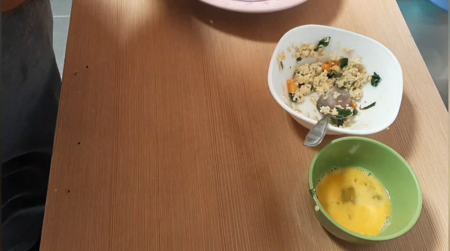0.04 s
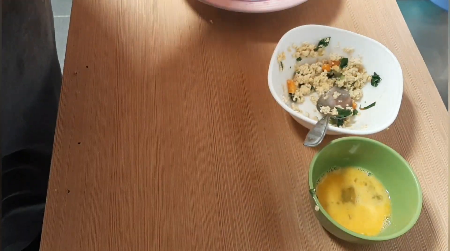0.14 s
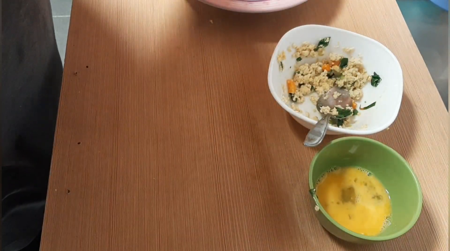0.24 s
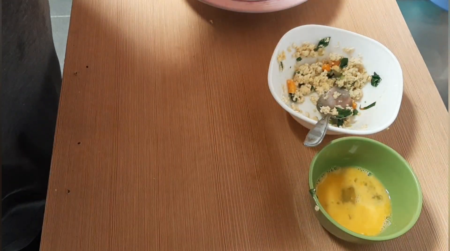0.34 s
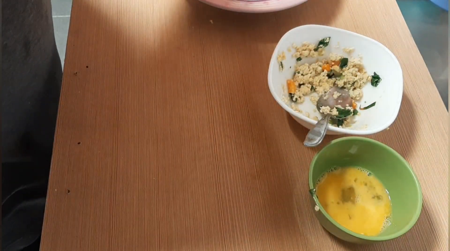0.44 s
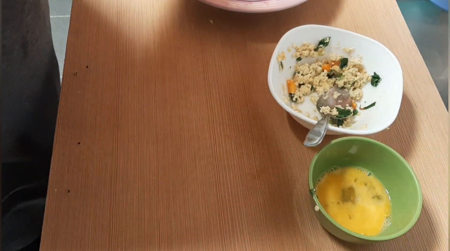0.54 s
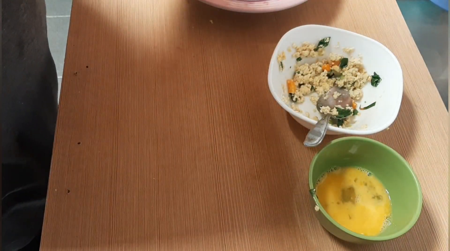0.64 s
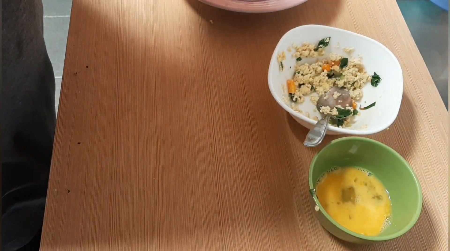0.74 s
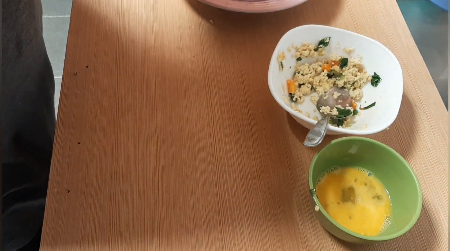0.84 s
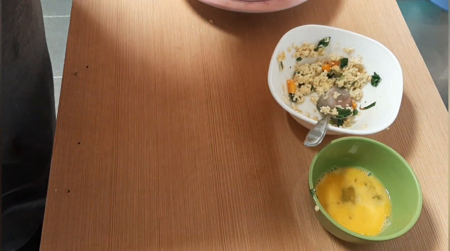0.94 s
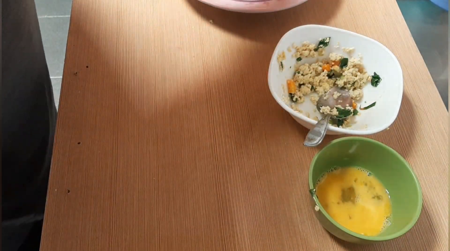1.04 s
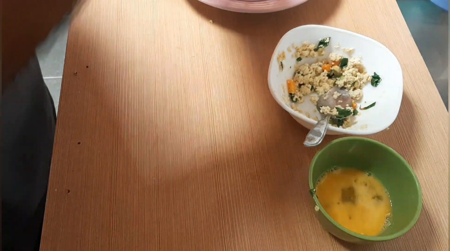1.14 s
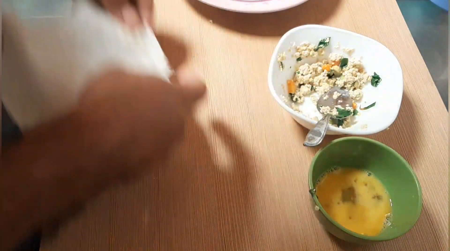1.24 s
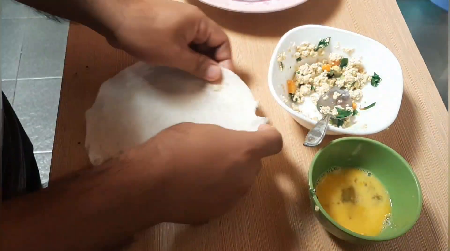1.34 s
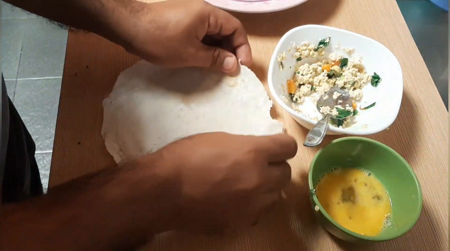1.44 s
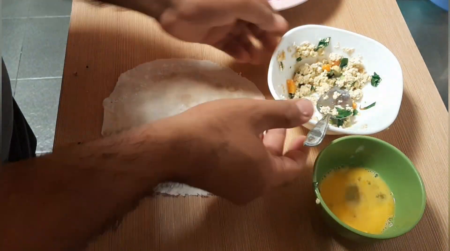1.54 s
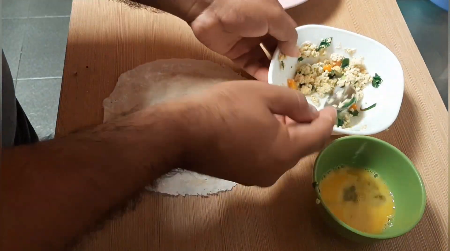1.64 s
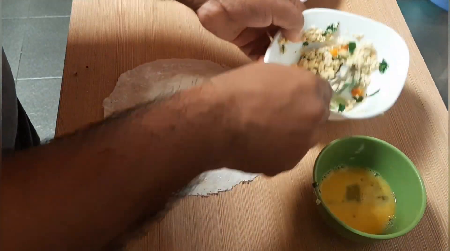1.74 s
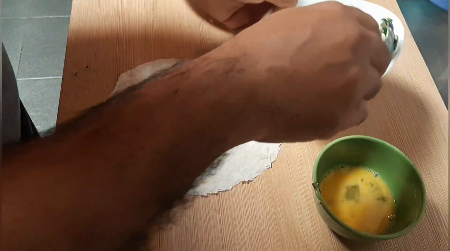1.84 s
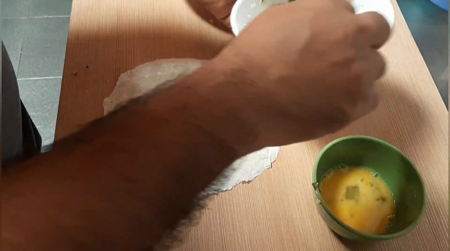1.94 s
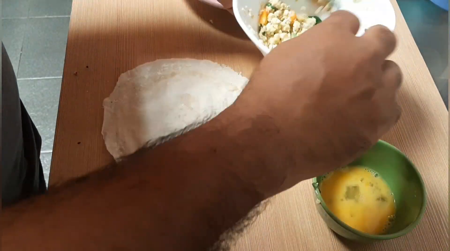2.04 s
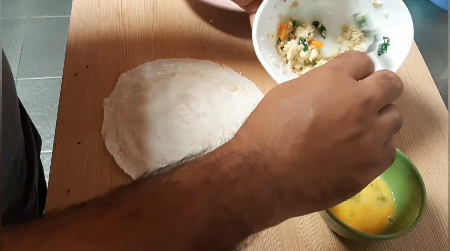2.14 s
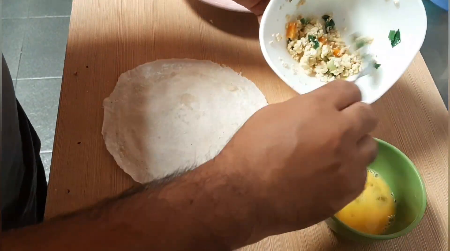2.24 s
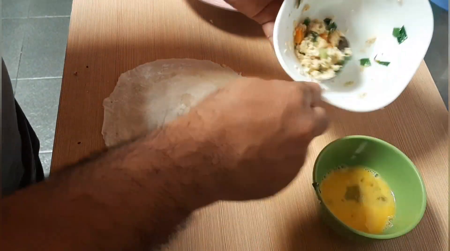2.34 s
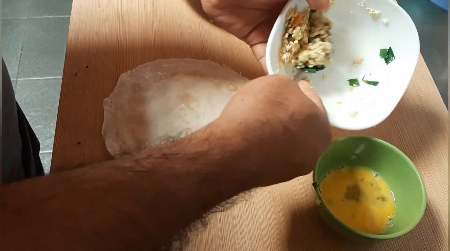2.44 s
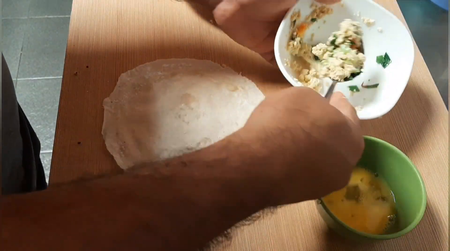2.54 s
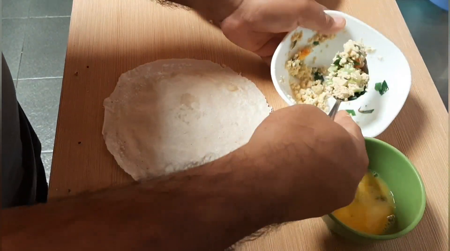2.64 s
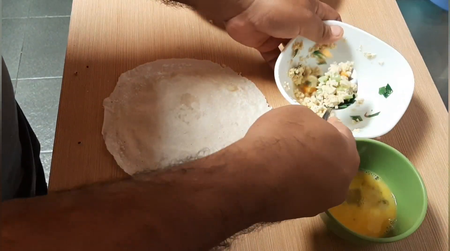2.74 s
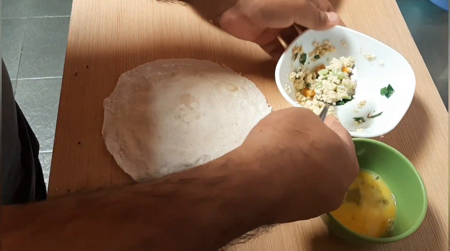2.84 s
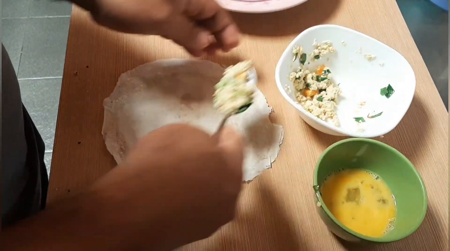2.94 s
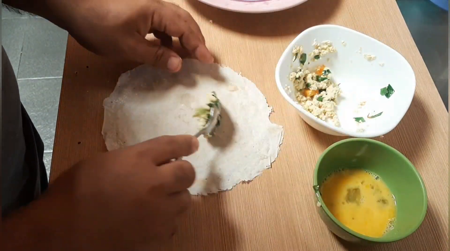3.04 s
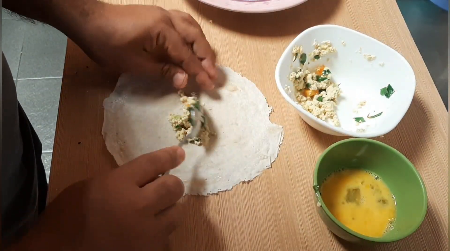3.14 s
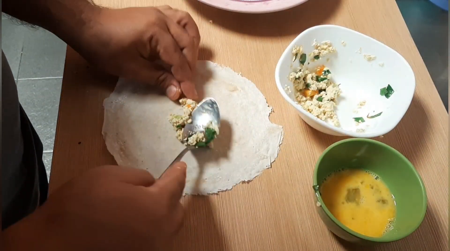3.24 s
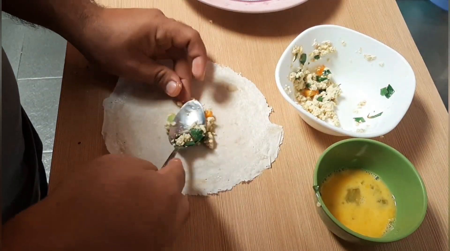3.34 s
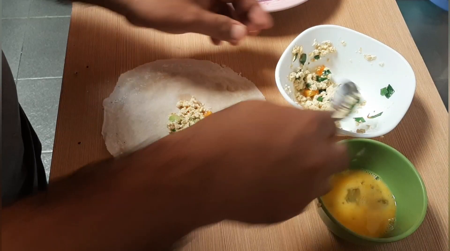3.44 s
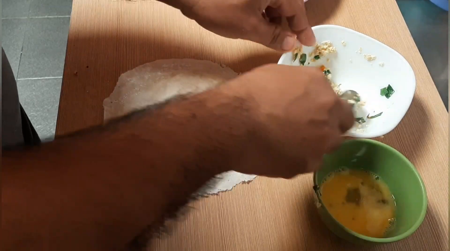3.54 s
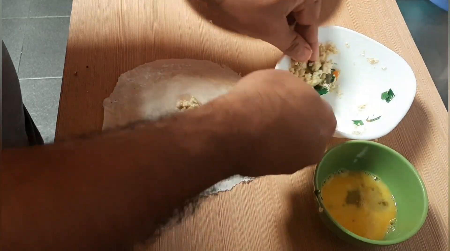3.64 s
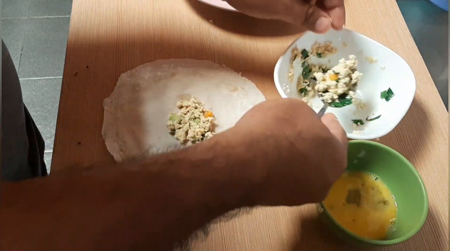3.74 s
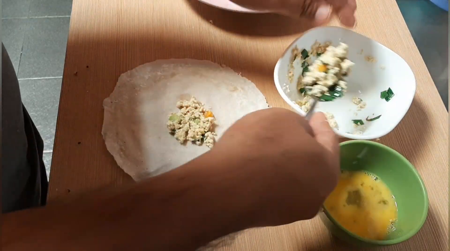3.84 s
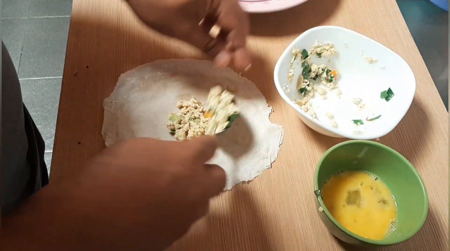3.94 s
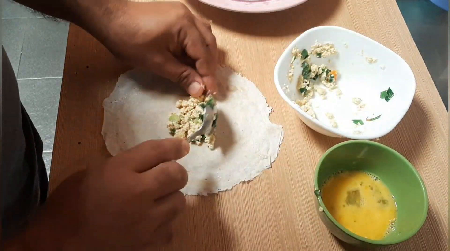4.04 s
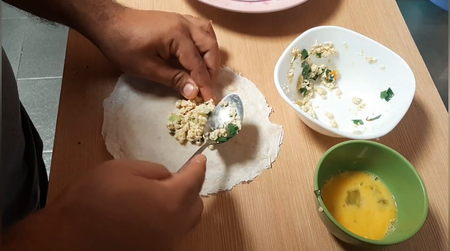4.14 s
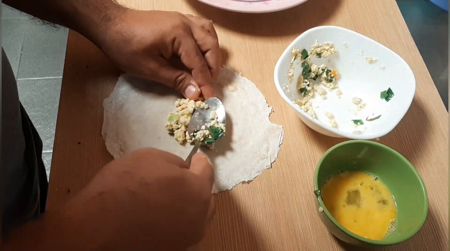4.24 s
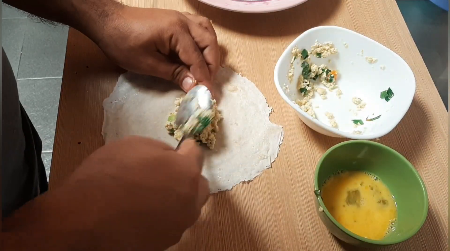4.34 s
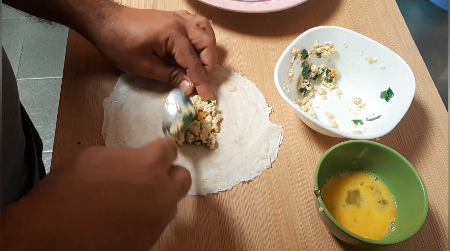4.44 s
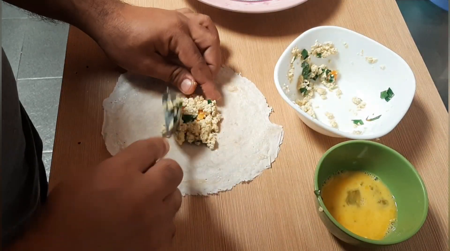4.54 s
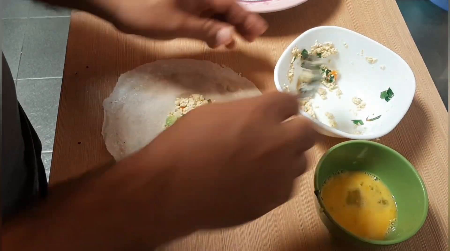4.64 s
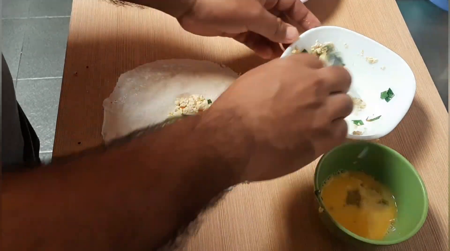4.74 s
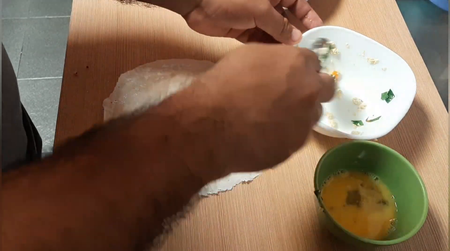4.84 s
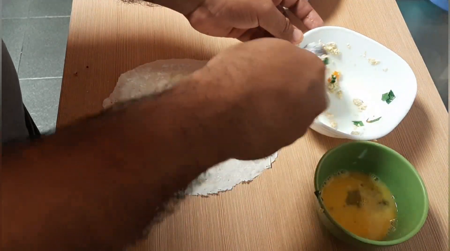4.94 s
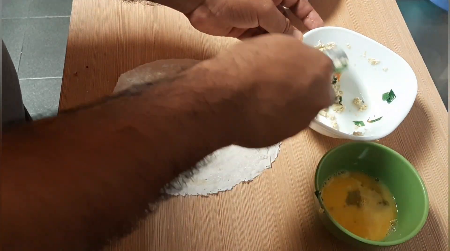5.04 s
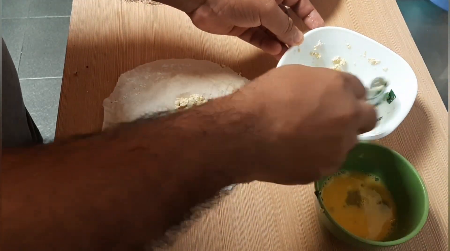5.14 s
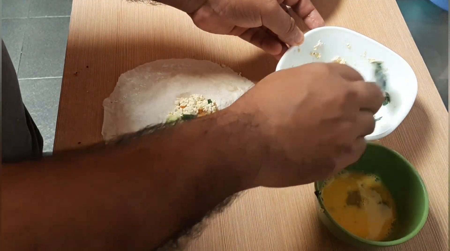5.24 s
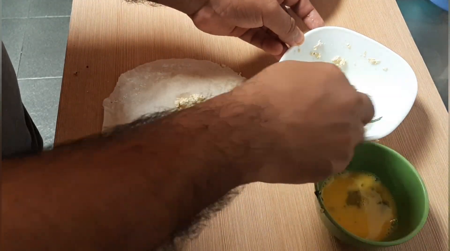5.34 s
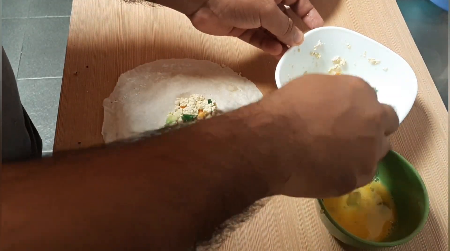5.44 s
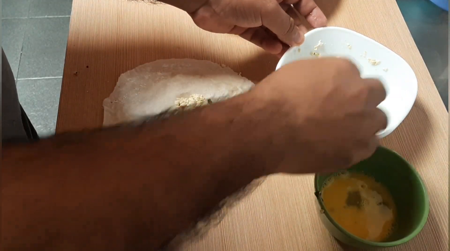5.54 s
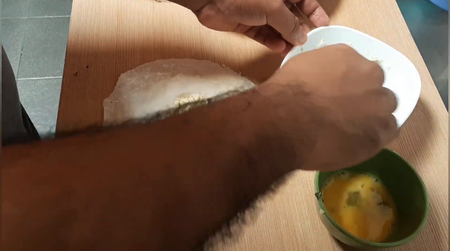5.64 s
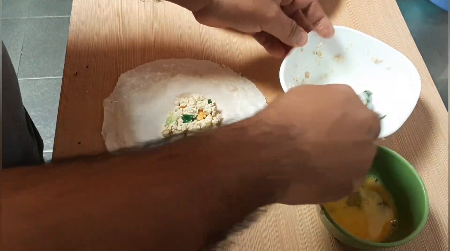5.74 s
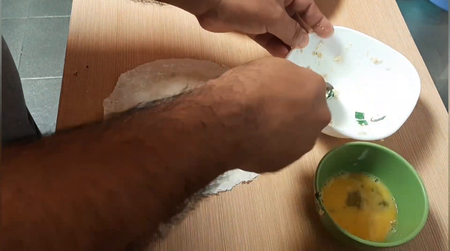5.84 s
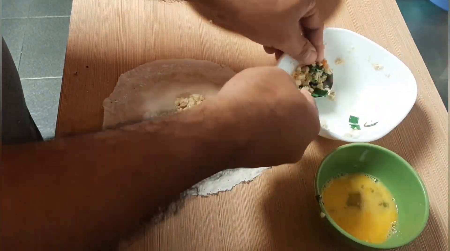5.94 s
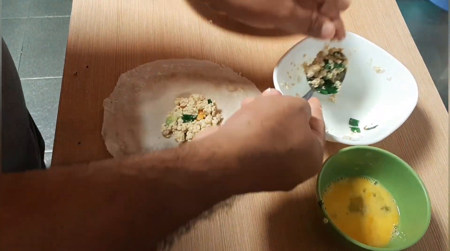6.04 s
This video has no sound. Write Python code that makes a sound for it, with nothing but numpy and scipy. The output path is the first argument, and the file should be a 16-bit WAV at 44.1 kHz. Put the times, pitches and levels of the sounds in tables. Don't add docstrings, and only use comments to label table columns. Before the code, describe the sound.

A quiet small kitchen with distant fan hum, airy hiss and wavering appliance drones; hands and dough rustle softly. At about 0.16 s the sound dips for an instant. Light brushes continue until small wooden taps at 1.7 s, when a spoon begins touching a ceramic bowl close by. A crisp clink at 2.1 s leads to a fast, dry cluster of clinks and scrapes at 2.2-2.4 s. Another clink at 2.65 s is followed by dull, hollow table knocks to 2.8 s. Mostly rustle remains until short clinks and scraping at 3.5-3.65 s, then a quieter stretch with faint brushes. From 4.77 s the spoon drags and strikes the emptier bowl: bright clinks at 4.9, 5.0 and 5.1 s, a strong ringing hit at 5.39 s, more at 5.6-5.7 s with a tiny wet squeak between, and final gritty scrapes and soft knocks at 5.8-6 s.

```python
import sys
import numpy as np
from scipy import signal
from scipy.io import wavfile
from scipy.ndimage import uniform_filter1d

SR = 44100
rng = np.random.default_rng(int(sys.argv[2]) if len(sys.argv) > 2 else 0)


def makeup_ratio(level_db):
    decades = np.asarray(level_db, float) / 20
    return 10 ** decades


def transcribe(u):
    v = np.clip(np.atleast_2d(u).T, -1, 1)
    q = np.round(v * 32767).astype(np.int16)
    wavfile.write(sys.argv[1], SR, q)


N = 269266
FREE_FROM, FREE_TO = 4.2, 5.785


def spoon():
    blow_rings, cracks = clinks()
    drag_rings, drag = scrapes()
    rings = blow_rings + drag_rings + pings()
    shake = wander((2, N), 250)
    rings *= makeup_ratio(1.6 * shake[0] + 0.7 * shake)

    t = np.arange(N) / SR
    free = (t >= FREE_FROM) & (t <= FREE_TO)
    contact = makeup_ratio(5.5) * cracks + makeup_ratio(np.where(free, -28, -25)) * drag
    edges_hz = [(700, 2260), (1500, 2900), (3300, 8900), (4800, 7230), (8900, 20000)]
    levels_db = [27.4, 22.9, 1.9, 17.2, 13.6]
    crack = squeak()
    for force, edges, db in zip(contact, edges_hz, levels_db):
        crack += makeup_ratio(db) * band(band(force, *edges), *edges)
    crack = np.array([np.roll(crack, 2), crack])
    return band(band(rings + crack, 400, 20000), 257, 20000)


def clinks():
    # (time [s], strength [dB], hardness [dB per family], lip of the rim [dB],
    # grip shift from family one to two [dB])
    blows = [(1.718, -46.5, -1, 3, 5), (1.7318, -64, -5, -1, 10), (2.0907, -29.5, 2.5, 7.5, -4.5),
             (2.2215, -45.5, 4.5, 10, 0), (2.2692, -24, 1, -4, -5.5), (2.2759, -27.5, 0.5, -6, 2.5),
             (2.377, -45.5, 1.5, 10, 6), (2.2910, -27.5, 2, -3, -8.5), (2.3045, -39, 3, -4, -9),
             (2.6419, -36, -1, -2, -1.5), (2.663, -60, -12, 0, 8), (2.678, -41.5, -1, 0, 11),
             (2.686, -44, 0.5, -3, 2), (1.927, -58, -6, -3, 7), (1.875, -56, -2.5, 0, -2.5),
             (1.993, -53, -1, 20, 0), (2.003, -51, 1.5, 15, -7), (2.319, -40.5, -1.5, -4, -5),
             (2.334, -41, 2, -4, -8), (2.3626, -43, 0.5, 14.5, 5), (3.548, -47, -4, -10, -4),
             (5.647, -59, 4, 12, 11), (2.812, -61, 1, -5, 17), (5.4, -41.5, -9, 8, 0),
             (3.5188, -35.5, 3, -2, -4.0), (3.5295, -37, 3.5, -25, -10), (3.5775, -39.5, 2.5, -15, -2),
             (3.6421, -36.5, 0, 6, -1), (4.906, -32.5, 2, 7.5, 8.5), (4.985, -24.5, 1, 5.5, 0),
             (5.0793, -34.5, 2, 0.8, 0.5), (5.1672, -41.5, -2, 6, -2), (5.3885, -19.5, -1.8, 5.5, 2),
             (5.5874, -35.5, 1.5, 4.5, -4), (5.708, -28.5, -0.9, -1, -3.5), (5.7335, -30.5, -0.7, -4, -1),
             (5.8068, -44, 4, -12, -9)]
    plain_db = [-9.5, -0.5, 0.5, 6.5, 5.5]
    hard_tilt, lip_tilt, grip_tilt = np.array([[-2, -1, 0, 1, 2], [0, 0, 1, 0, 0], [-1, 1, 0, 0, 0]])
    rings, cracks = np.zeros((2, N)), np.zeros((5, N))
    for s, db, hard, lip, grip in blows:
        colour = hard * hard_tilt + lip * lip_tilt + grip * grip_tilt
        strength = makeup_ratio(db + colour + plain_db)[:, None]
        add(rings, s - 0.0002, rim(s, makeup_ratio(5.0) * strength * bounce()))
        add(cracks, s - 0.0003, strength * chatter(0.0023, 0.00047))
    return rings, cracks


def scrapes():
    # (time [s], pressure [dB], hardness [dB per family], edge bite [dB], length [s])
    strokes = [(1.759, -58, 6.5, 17.5, 0.021), (1.869, -44, 3.5, -0.5, 0.057), (1.9897, -45, 6.5, 3, 0.047),
               (2.198, -35, 2.5, 2.5, 0.061), (2.303, -32, 3, 4, 0.065), (2.36, -34.5, -1, 4.5, 0.032),
               (3.522, -38, 5, 7, 0.075), (3.605, -44, -10, -4, 0.064), (4.771, -31, -2, -0.7, 0.05),
               (4.89, -24.5, 2, -5, 0.064), (4.895, -36.5, -7.5, 4, 0.14), (5.167, -34, 0.5, 2, 0.039),
               (5.8016, -47, 9.5, 14, 0.017), (5.8236, -36.5, -3, -3, 0.051),
               (5.939, -32.5, -3, -3.5, 0.036), (5.72, -35, -0.5, -8, 0.017),
               (5.588, -34.5, 0.5, -3, 0.033)]
    plain_db = [-11.5, 1.4, 1.3, 3, 2.3]
    hard_tilt, bite_tilt = np.array([[-1, -1, 0, 1, 2], [0, 0, 1, 1, 0]])
    slips = evened(rng.standard_normal(N) * makeup_ratio(3.8 * np.minimum(rng.exponential(1, N), 5)))
    slips *= makeup_ratio(1.2 * evened(uniform_filter1d(rng.standard_normal(N), 130)))
    rings, drag = np.zeros((2, N)), np.zeros((5, N))
    for s, db, hard, bite, length in strokes:
        colour = hard * hard_tilt + bite * bite_tilt
        push = makeup_ratio(db + colour + plain_db)[:, None] * stroke(length)
        push = push * slips[round(s * SR):][:push.shape[1]]
        add(drag, s - 0.007, push)
        add(rings, s - 0.007, rim(s, makeup_ratio(-25.0) * push))
    return rings, drag


def pings():
    # (time [s], level [dB], pitch [Hz], t60 [s])
    single_pings = [(2.642, -44.5, 3130, 0.071), (2.6427, -41.5, 1626, 0.15), (2.644, -43, 4700, 0.1),
                    (3.6133, -43, 3970, 0.1), (3.6420, -28, 3260, 0.028), (3.6418, -31.5, 4570, 0.019),
                    (4.9855, -22, 10830, 0.03), (5.167, -35, 9150, 0.078), (5.3888, -22, 10375, .08),
                    (5.3888, -22, 11940, .05), (2.2692, -17, 2239, .05), (5.3886, -13.5, 3921, .07),
                    (5.3886, -25, 3921, .2), (5.3886, -24, 3836, .06), (5.396, -25.5, 2256, .14),
                    (2.7674, -23, 1384, 0.03), (2.7662, -31, 760, .025), (2.2699, -22, 3823, 0.061),
                    (5.3882, -20, 1550, 0.013), (2.6735, -24.5, 692, 0.16), (2.767, -37, 1054, 0.11),
                    (2.766, -44, 1550, 0.15), (5.078, -31.5, 2660, 0.016), (5.177, -48, 1655, 0.073),
                    (5.28, -62, 2235, 0.18), (1.995, -43, 9200, 0.054), (5.5878, -30, 13760, 0.1),
                    (5.5874, -25, 3993, 0.094), (5.7324, -35.5, 6380, 0.033), (5.806, -26.5, 6620, 0.017),
                    (5.8076, -43.5, 2820, 0.032), (6.0182, -39, 650, 0.026)]
    out = np.zeros((2, N))
    for s, db, hz, t60 in single_pings:
        add(out, s, makeup_ratio(db + 2.5) * ring([(hz, 0, t60)], 0.24))
    return out


def squeak():
    start_s, length_s, from_hz, to_hz, db = 5.636, 0.036, 2900, 2000, -40
    u = np.linspace(0, 1, round(length_s * SR))
    glide = to_hz + (from_hz - to_hz) * (1 - u) ** 2
    glide *= 1 + 0.05 * evened(uniform_filter1d(rng.standard_normal(len(glide)), 40))
    out = np.zeros(N)
    add(out, start_s, makeup_ratio(db) * np.hanning(len(glide)) * np.sin(2 * np.pi * np.cumsum(glide) / SR))
    return out


def rim(s, force):
    free_hz = [
        [970, 1647],
        [2256, 2530, 3133],
        [3810, 3919, 4435],
        [5790, 5850, 6240, 6600],
        [8171, 9345, 10002, 10385, 10798, 11347, 11972, 12489, 13781, 15051, 15525],
    ]
    # (level [dB], t60 [s])
    free_ringing = [
        [(2.5, 0.059), (-3, 0.035)],
        [(-3, 0.26), (-6, 0.024), (-11.5, 0.033)],
        [(4.5, 0.084), (10.5, 0.11), (3, 0.02)],
        [(-7.5, 0.07), (-3, 0.1), (-12.5, 0.019), (-9, 0.0063)],
        [(-2, 0.03), (1, 0.02), (-9, 0.041), (3, 0.021), (2.5, 0.019), (0, 0.1), (-14, 0.028), (-5, 0.12),
         (-11, 0.04), (-14.5, 0.036), (-24, 0.044)],
    ]
    full_hz = [
        [985, 1550],
        [2013, 2235, 2562, 3130],
        [3574, 3822, 3915, 4446],
        [5500, 5846, 6080, 6319, 6640],
        [8053, 9302, 9528, 10379, 10809, 11918, 12467, 13156, 13560, 14760, 15700],
    ]
    # (level [dB], t60 [s])
    full_ringing = [
        [(6, 0.038), (-9.5, 0.11)],
        [(5.5, 0.041), (1.5, 0.11), (-10, 0.0025), (-2, 0.22)],
        [(-3.5, 0.022), (-5, 0.032), (5.5, 0.014), (-17, 0.043)],
        [(-29, 0.09), (5.5, 0.024), (7, 0.0053), (7.5, 0.023), (-3, 0.016)],
        [(3.5, 0.021), (0.5, 0.059), (10.5, 0.01), (2.5, 0.025), (4.5, 0.03), (6, 0.022), (3, 0.038),
         (-8, 0.0177), (-2.5, 0.034), (-27.5, 0.019), (-23, 0.016)],
    ]
    # (time [s], share of the ring time [0-1])
    looseness = [(1.7, 1), (2.0, 1), (2.09, 0.8), (2.2, 0.67), (2.27, 0.95), (2.3, 0.35), (2.64, 1),
                 (3.55, 0.6), (4.77, 0.66), (4.9, 0.77), (4.985, 0.27), (5.08, 0.51), (5.17, 0.8),
                 (5.39, 0.58), (5.59, 0.84), (5.71, 0.95), (5.8, 0.56), (5.94, 0.8)]
    free = FREE_FROM < s < FREE_TO
    pitches, ringings = (free_hz, free_ringing) if free else (full_hz, full_ringing)
    loose = max(np.interp(s, *np.transpose(looseness)), 0.1)
    lasting = [0.84, 0.12, 0.42, 0.18, 0.12]
    out = 0
    for push, family_hz, ringing, share in zip(force, pitches, ringings, lasting):
        modes = []
        for hz, (db, t60) in zip(family_hz, ringing):
            detune, uneven_db = rng.standard_normal(2) * [0.002, 1.6]
            modes.append((hz * (1 + detune), db + uneven_db, t60 * loose))
        answer = ring(modes, 0.75, lasting=share * (1 if free else 1.21))
        out = out + signal.fftconvolve(push[None], answer, axes=1)
    return out


def ring(modes, spread, factor=1, lasting=1):
    t = np.arange(SR // 4) / SR
    phases = 2 * np.pi * rng.random((len(modes), 1, 1)) + spread * rng.standard_normal((len(modes), 2, 1))
    out = 0
    for (hz, db, t60), phase in zip(modes, phases):
        out = out + makeup_ratio(db - 60 * t / t60) * np.sin(2 * np.pi * hz * factor * t + phase)
    lasting = min(lasting, 1)
    out *= lasting + (1 - lasting) * np.exp(-t / 0.003)
    out *= 1 - np.exp(-t / 0.0005)
    return out / np.sqrt(sum(makeup_ratio(2 * db) for _, db, _ in modes))


def bounce():
    force = np.zeros((5, 1024))
    force[:, 0] = 1
    gaps_s = 0.0035 * rng.uniform(0.6, 1.4, 3) * 0.8 ** np.arange(3)
    at = np.cumsum(gaps_s * SR).astype(int)
    force[:, at] = makeup_ratio(-1.5 * np.arange(1, 4)) * rng.uniform(-0.6, 1, (5, 3))
    return force


def chatter(length, rise):
    t = np.arange(2048) / SR
    force = rng.standard_normal(2048) * np.exp(-t / max(length, 1e-4)) * (1 - np.exp(-t / rise))
    return force / np.linalg.norm(force)


def stroke(length):
    u = np.arange(0, 2.5, 1 / (SR * max(length, 0.005)))
    return np.minimum(u / 0.18, 1) * np.exp(-1.3 * u ** 2)


def partials():
    # (time [s], level [dB], pitch [Hz], t60 [s])
    clear_modes = [(5.3888, -50, 5852, 0.19), (5.3888, -34.5, 9356, .045), (5.39, -35, 10900, .11),
                   (5.3876, -19.5, 12600, .09), (5.5878, -37, 9500, 0.078), (5.587, -41, 8050, 0.16),
                   (5.5878, -48, 14480, .045), (5.7074, -38, 985, 0.12), (5.709, -31.5, 3925, 0.11),
                   (5.7084, -29.5, 5800, 0.079), (5.7078, -32, 10030, 0.055), (5.7078, -35, 10250, .2),
                   (5.7078, -33, 12600, .12), (5.803, -36, 13050, .05), (5.803, -35.5, 9430, 0.066),
                   (5.941, -42, 5850, .06), (5.939, -36, 1950, .04), (5.947, -38.5, 626, .04),
                   (5.952, -33, 1800, 0.028), (5.962, -45, 960, 0.11), (4.9847, -23.5, 8140, 0.11),
                   (4.9858, -37, 5980, .2), (4.9852, -46, 10790, .15), (4.9852, -44, 15020, .075),
                   (4.9852, -44, 2245, 0.13), (5.081, -35, 8200, 0.11), (5.081, -39.5, 5930, .14),
                   (5.08, -50, 13850, .11), (4.9056, -44, 9335, 0.11), (4.9056, -45, 10900, .2),
                   (4.9056, -41, 11330, .11), (4.895, -42, 13780, .14), (2.0902, -20.5, 10050, 0.028),
                   (2.091, -40, 10000, .09), (2.091, -39, 11920, .1), (2.0895, -32, 3850, 0.078),
                   (2.268, -20, 6080, 0.062), (2.2755, -31, 13250, .03), (2.2755, -56, 7822, .075),
                   (2.2912, -28, 4430, 0.037), (2.2932, -32, 5960, .13), (2.2912, -36, 15700, .05),
                   (2.3032, -22, 5380, 0.033), (1.675, -41, 3250, .025), (1.681, -35, 1820, 0.028),
                   (1.718, -35, 3300, 0.018), (1.732, -36, 1850, 0.021), (1.755, -50, 3560, .15),
                   (3.53, -37.5, 2256, 0.12), (3.53, -44, 12600, .05)]
    out = np.zeros((2, N))
    for s, db, hz, t60 in clear_modes:
        add(out, s, makeup_ratio(db) * ring([(hz, 0, t60)], 0.78))
    return out


def table():
    # (time [s], wood [dB], snap [dB], pitch factor [ratio], contact length [s])
    knocks = [(1.675, -40.5, -33, 1.24, 0.0054), (1.698, -39, -68.5, 1.07, 0.0033),
              (1.72, -38, -43, 0.99, 0.0037), (2.6733, -20.5, -18.5, 1.05, 0.018),
              (2.7662, -19, -33, 1.01, 0.0065), (2.7689, -21.5, -24.5, 1.01, 0.0018),
              (2.78, -34.5, -55, 1.07, 0.0017), (4.617, -50, -53, 0.76, 0.0058),
              (3.015, -51, -64, 0.79, 0.0041), (3.527, -39.5, -59, 0.87, 0.0055),
              (4.909, -45.5, -51, 0.86, 0.0023), (5.388, -31.5, -42, 1.53, 0.0053),
              (5.718, -38.5, -27, 0.9, 0.011), (5.942, -38, -34, 0.91, 0.0012),
              (5.966, -44.5, -42, 1.18, 0.0076)]
    # (pitch [Hz], level [dB], t60 [s])
    top_modes = [(450, -17, 0.069), (671, -3, 0.12), (760, 4.5, 0.074), (923, -1.5, 0.096),
                 (1084, -2, 0.082), (1330, -7, 0.034), (1550, -8, 0.089), (2240, -13, 0.045)]
    # (pitch [Hz], level [dB], t60 [s])
    leg_modes = [(96.7, 13.5, 0.1), (185, -21, 0.07), (320, -9, 0.068)]
    out, t = np.zeros((2, N)), np.arange(8192) / SR
    for s, wood, snap, pitch, length in knocks:
        thump = wood - 13
        force = chatter(length, 0.00036)
        press = np.abs(force) / np.abs(force).sum()
        top = ring(top_modes, 0.6, pitch, lasting=0.37)
        legs = signal.oaconvolve(press[None], ring(leg_modes, 0.054, pitch), axes=1)
        add(out, s - 0.001, makeup_ratio(thump + 19) * legs)
        add(out, s - 0.0005, makeup_ratio(wood + 5.0) * top)
        many = rng.standard_normal(8192)
        add(out, s, makeup_ratio(wood - 4.5 - 60 * t / 0.067) * evened(band(many, 170, 1160)))
        add(out, s, makeup_ratio(thump - 1.5 - 60 * t / 0.14) * evened(band(many, 100, 337)))
        add(out, s - 0.001, makeup_ratio(snap + 21.0) * band(force, 830, 4040))
    return band(out, 49, 20000)


def arms():
    # (time [s], level [dB], length [s])
    leans = [
        (1.642, -58, 0.054),
        (2.072, -51, 0.08),
        (2.368, -48.5, 0.055),
        (3.7, -51.5, 0.11),
        (4.886, -47, 0.11),
        (5.587, -49, 0.032),
        (5.945, -48.5, 0.07),
    ]
    push = np.zeros(N)
    for s, db, length in leans:
        add(push, s, makeup_ratio(db) * stroke(length))
    return toward_left(push * evened(band(rng.standard_normal(N), 48, 140)), -3)


def kitchen():
    # (pitch [Hz], level [dB per Hz])
    air_colour = [(15, -45.5), (30, -50), (70, -12.5), (110, -3), (260, -13), (520, -14), (750, -17.5),
                  (1250, -19), (2000, -23), (2700, -24), (4400, -21.5), (8700, -32.5), (11000, -28.5),
                  (16000, -27.5)]
    frames, hz = N // 256 + 5, np.fft.rfftfreq(1024, 1 / SR)[:, None]
    patches = uniform_filter1d(rng.standard_normal((513, frames)), 14, 0)
    patches = evened(uniform_filter1d(patches, 10, 1))
    colour = read(air_colour, hz) + fan_bands(hz, frames)
    air = makeup_ratio(-57.0) * evened(noise(colour + 3.1 * patches, frames, 1024))
    base = noise(colour + 2.0 * patches[::-1], frames, 1024)
    cloth = noise(read(air_colour, hz) * np.ones(frames), frames, 1024)
    return air + rustle(base, frames) + brushes(cloth)


def fan_bands(hz, frames):
    # (pitch [Hz], width [Hz])
    hum_hz = [(100, 22), (398, 25), (495, 25), (581, 30), (861, 28), (968, 25), (1550, 65), (1808, 30),
              (2050, 60), (2336, 25)]
    hum_db = [5.8, 0.92, 8.4, 11.5, 5.8, 16.5, 9.8, 6, 9.6, 5.6]
    waver = evened(uniform_filter1d(rng.standard_normal((len(hum_hz), frames)), 12))
    return sum((db + 3.2 * v) * np.exp(-((hz - f) / w) ** 2) for (f, w), db, v in zip(hum_hz, hum_db, waver))


def rustle(base, frames):
    # (time [s], effort [0-1])
    hands = [(0, 0.87), (.3, 0.44), (1.2, 0.69), (1.4, 0.53), (1.83, 0.85), (2.26, 0.9), (2.45, 0.4),
             (2.84, 0.68), (3.3, 0.54), (3.6, 0.79), (3.9, 0.48), (4.45, 0.59), (4.8, 0.77), (4.98, 0.78),
             (5.2, 0.7), (5.45, 0), (5.62, 0.93), (6.1, 0.48)]
    rest_db = [-73, -76.5, -68, -95]
    busy_db = [19.6, 26.6, 19.5, 19]
    gust_db = [2.5, 1.2, 1.2, 1.5]
    effort = np.interp(np.arange(frames) * 256 / SR, *np.transpose(hands))
    gusts = wander((4, frames), 20)
    edges_hz = [(55, 114), (250, 1340), (1500, 8300), (7000, 20000)]
    out = 0
    for rest, busy, gust, slow, edges in zip(rest_db, busy_db, gust_db, gusts, edges_hz):
        level_db = np.interp(np.arange(N) / 256, np.arange(frames), rest + busy * effort + gust * slow)
        out = out + makeup_ratio(level_db - 5.0) * evened(band(base, *edges))
    return out


def brushes(cloth):
    # (time [s], pressure [dB], dryness [dB per band], swish [dB], length [s])
    passes = [(0.13, -55, 2.5, -0.5, 0.082), (0.254, -71, 12, 5, 0.1), (0.416, -46, 7, -19, 0.061),
              (0.465, -53.5, 9, -7, 0.029), (0.829, -59, -6, 13, 0.034), (1.033, -51.5, 7, -7, 0.049),
              (1.28, -47.5, 5, -9, 0.098), (1.539, -57, -8.5, 7, 0.045), (1.628, -61, -1.5, 10.5, 0.066),
              (1.919, -43.5, 6, -18, 0.011), (2.632, -39, 7, -25, 0.029), (2.998, -60, -9.5, 7, 0.069),
              (3.615, -44.5, -1.5, -6, 0.04), (3.73, -58, 2, -8, 0.027), (4.124, -73, 7, 13, 0.029),
              (4.611, -49, 1.5, -21, 0.048), (4.645, -61, -5.5, -20, 0.056), (4.701, -49.5, 3, -5, 0.013),
              (5.512, -64.5, 3.5, 15, 0.05), (5.974, -53.5, 4.5, 1, 0.027)]
    plain_db = [12.5, 4.5, 7, -7.5]
    dry_tilt, swish_tilt = np.array([[-1, 0, 1, 2], [0, 0, 1, 0]])
    pressure = np.zeros((4, N))
    for s, db, dryness, swish, length in passes:
        colour = dryness * dry_tilt + swish * swish_tilt + plain_db
        add(pressure, s, makeup_ratio(db + colour - 12.5)[:, None] * stroke(length))
    edges_hz = [(200, 1930), (1200, 3000), (3500, 11200), (7000, 20000)]
    return sum(p * evened(band(cloth, *edges)) for p, edges in zip(pressure, edges_hz))


def noise(db_field, frames, size):
    # (pitch [Hz], left-right likeness [0-1])
    likeness = [(30, 0.78), (100, 1), (400, 1), (1200, 0.13), (4000, 0.086), (15000, 0.049)]
    # (pitch [Hz], left over right [dB])
    balance = [(60, -6.5), (240, -3), (950, -5.5), (3770, -1.5), (15000, 0.5)]
    lag = 20 / SR
    hz = np.fft.rfftfreq(size, 1 / SR)
    a, b, c, d = rng.standard_normal((frames, len(hz), 4)).T
    same, left = np.clip(read(likeness, hz), -1, 1)[:, None], a + 1j * b
    right = same * left + np.sqrt(1 - same ** 2) * (c + 1j * d)
    right = right * np.exp(-2j * np.pi * hz * lag)[:, None]
    lean = makeup_ratio(read(balance, hz) / 2)[:, None]
    z = np.array([left * lean, right / lean]) * makeup_ratio(db_field)
    return signal.istft(z, nperseg=size, noverlap=size * 3 // 4)[1][:, :N]


def drones():
    # (pitch [Hz], level [dB], width [Hz])
    tones = [(102, -63.5, 12), (409, -75, 5.7), (505, -73.5, 7.5), (582, -78, 6.7), (845, -72, 8),
             (1620, -85.5, 14), (2050, -90, 14)]
    t, out = np.arange(N) / SR, 0
    for hz, db, width_hz in tones:
        r = np.exp(-np.pi * width_hz / SR)
        a, b = rng.standard_normal((2, N))
        envelope = signal.lfilter([1 - r], [1, -r], a + 1j * b)
        tone = (envelope * np.exp(2j * np.pi * hz * t)).real
        out = out + makeup_ratio(db + 3.5 * wander(N, SR // 5)) * evened(tone)
    return toward_left(np.array([np.roll(out, 20), out]), -3)


def room(x):
    # (pitch [Hz], t60 [s])
    decay = [(200, 0.13), (1000, 0.21), (4000, 0.21), (9000, 0.15), (15000, 0.14)]
    taps = np.zeros((2, SR // 2))
    at = np.arange(200, SR // 2 - 20, 20)
    at = at + rng.integers(0, 20, (2, len(at)))
    np.put_along_axis(taps, at, rng.choice([-1., 1.], at.shape), 1)
    hz, t, z = signal.stft(taps, SR, nperseg=256)
    tail = signal.istft(z * makeup_ratio(-60 * t / read(decay, hz)[:, None]), SR, nperseg=256)[1]
    return signal.fftconvolve(x, tail / np.linalg.norm(tail[0]), axes=1)[:, :N]


def evened(x):
    return x / np.sqrt(np.mean(x ** 2) + 1e-20)


def wander(shape, length):
    return evened(uniform_filter1d(uniform_filter1d(rng.standard_normal(shape), length), length))


def read(points, hz):
    f, value = np.transpose(points)
    return np.interp(np.log(hz + 1), np.log(f + 1), value)


def add(mix, s, sound):
    part = mix[..., round(s * SR):][..., :sound.shape[-1]]
    part += sound[..., :part.shape[-1]]


def band(x, lo_hz, hi_hz):
    return signal.sosfilt(signal.butter(2, [lo_hz, hi_hz], "band", fs=SR, output="sos"), x)


def toward_left(x, db):
    return x * makeup_ratio(np.outer([0.5, -0.5], db))


def scene():
    # (time [s], left over right [dB])
    position = [(1.7, -4), (2.1, -1), (2.4, -3.5), (3.6, -2), (4.9, -1), (5.3, -1.1), (5.7, -3.5)]
    side_db = np.interp(np.arange(N) / SR, *np.transpose(position))
    bowl = toward_left(spoon(), side_db)
    wood = toward_left(table(), -1.6)
    echoes = room(makeup_ratio(-10.0) * bowl + makeup_ratio(-9) * wood)
    near = bowl + wood + toward_left(partials(), side_db) + arms()
    return near + echoes + kitchen() + drones()


def top_cut(x):
    return signal.sosfilt(signal.butter(12, 17100, fs=SR, output="sos"), x)


def record(dry):
    out_s, in_s, back_s, dip_db = 0.159, 0.172, 0.182, -22
    dip = np.interp(np.arange(N) / SR, [out_s, out_s + 0.002, in_s, back_s], [0, dip_db, dip_db, 0])
    dipped = dry * makeup_ratio(dip)
    low_pass = signal.firwin(511, 15850, window=("kaiser", 7), fs=SR)
    leak = makeup_ratio(-30)
    heard = (1 - leak) * signal.oaconvolve(dipped, low_pass[None], "same", axes=1) + leak * dipped
    heard = heard - 0.34 * signal.lfilter(*signal.iirpeak(8650, 9, SR), heard)
    return top_cut(heard)


dry = scene()
out = record(dry)
transcribe(out)
```